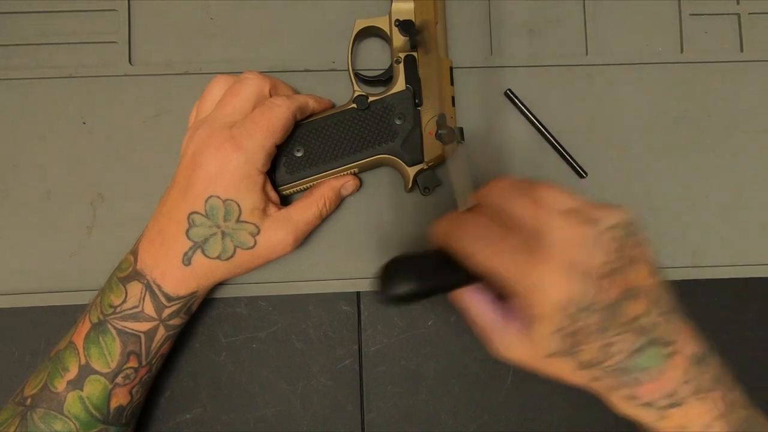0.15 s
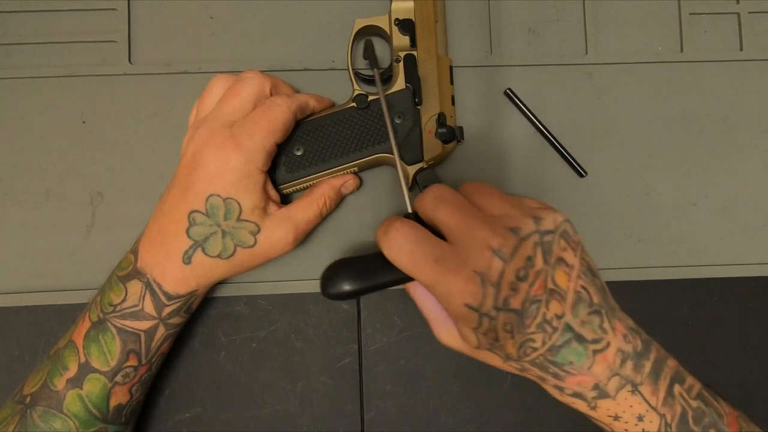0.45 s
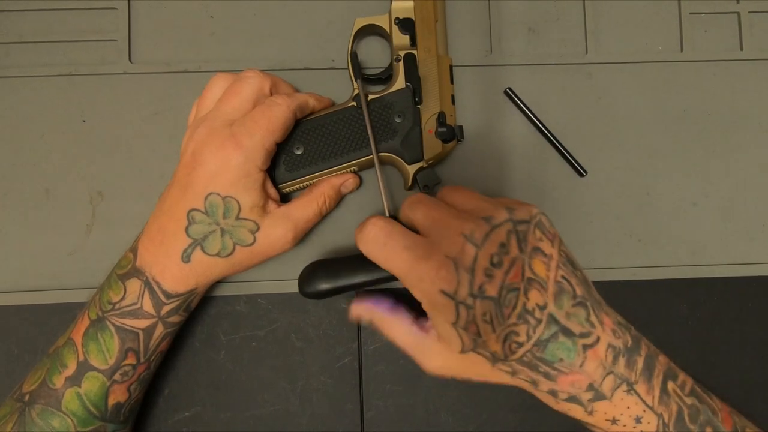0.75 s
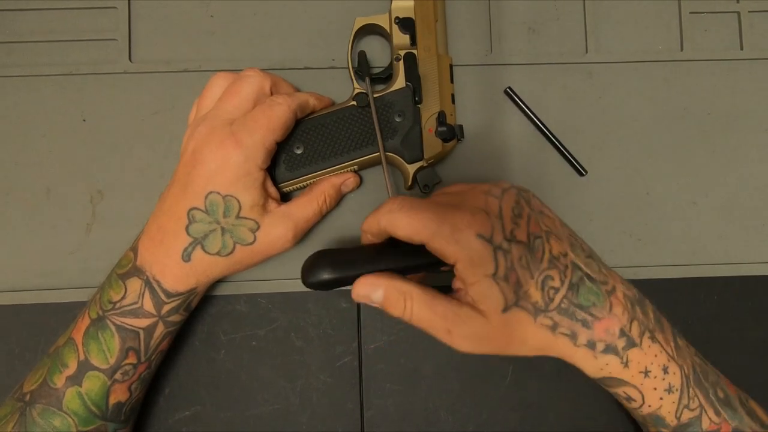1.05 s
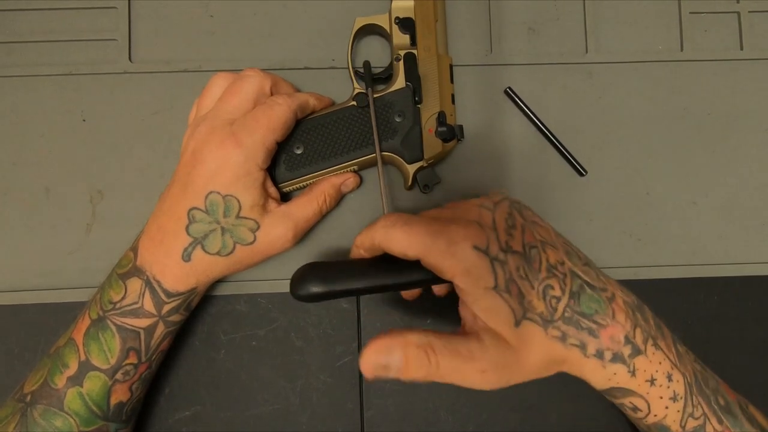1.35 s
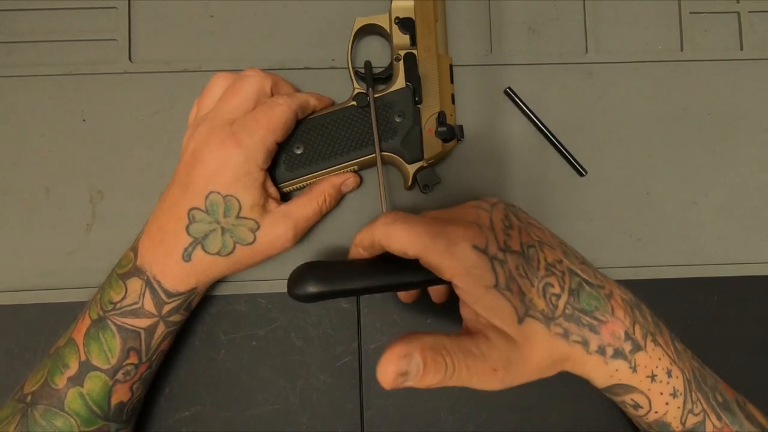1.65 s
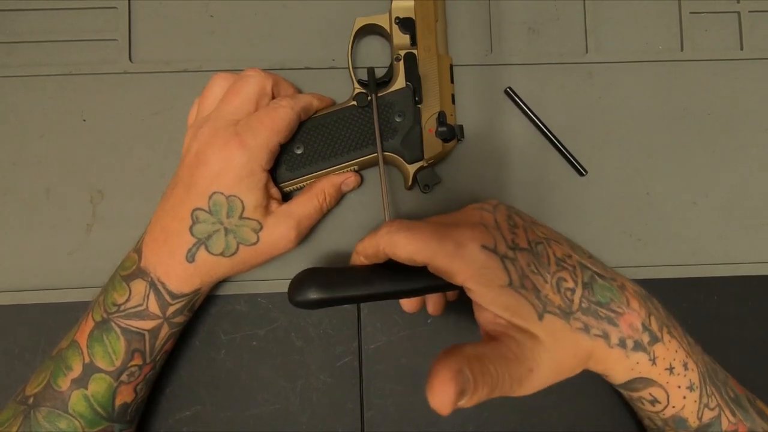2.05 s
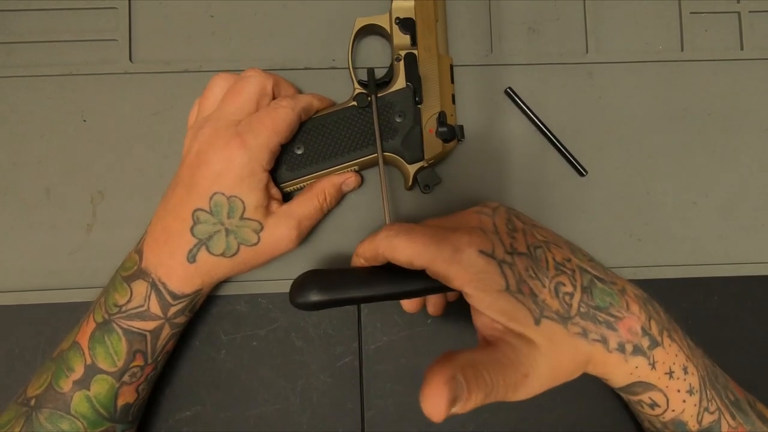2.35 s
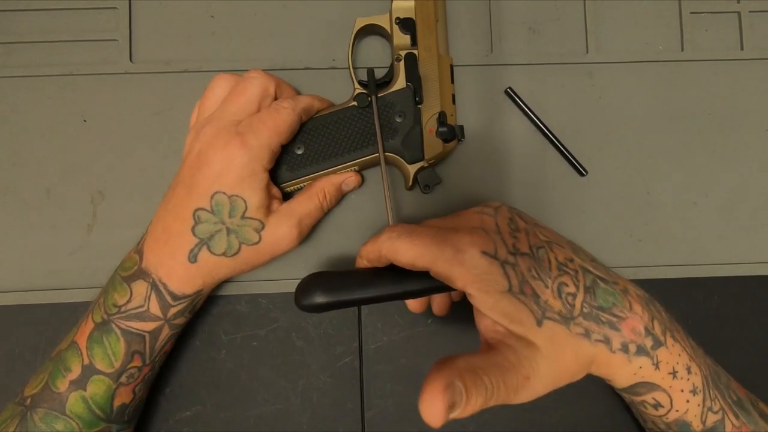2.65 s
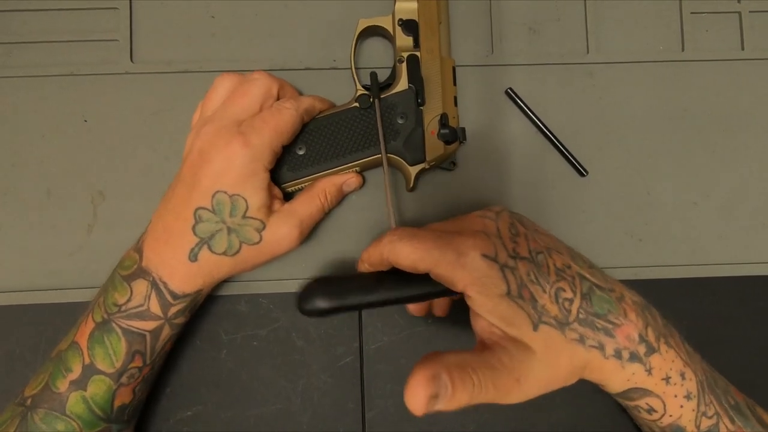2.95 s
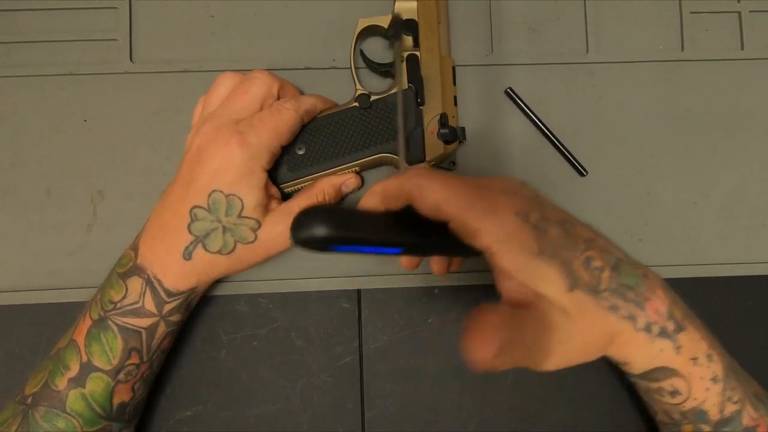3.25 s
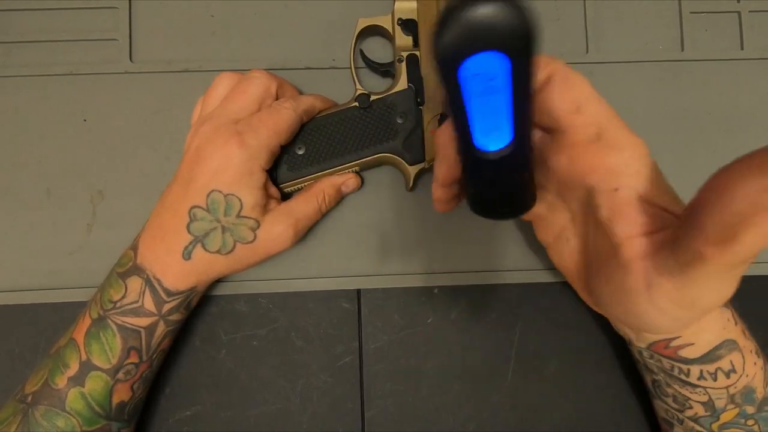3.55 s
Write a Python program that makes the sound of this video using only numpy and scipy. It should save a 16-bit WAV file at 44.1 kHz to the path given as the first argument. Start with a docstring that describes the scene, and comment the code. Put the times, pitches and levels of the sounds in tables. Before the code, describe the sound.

Pistol trigger tested with a metal gauge: sharp clicks and a loud hammer snap in a quiet room

```python
"""Over ventilation hum and hiss in a small quiet room, a trigger gauge is hooked into a pistol lying on a mat.
Its rod taps and scrapes, the trigger takes up, the hook ticks, the hammer falls and shakes the bench, and
the hook knocks free. Air and scrapes are shaped noise; each blow is a noisy crack, a sum of dying modes and
a bench thud, with a separate feed to the room's echo. A microphone pair stands above the bench."""
import sys
import numpy as np
from scipy import signal
from scipy.fft import rfft, irfft
from scipy.io import wavfile
from scipy.ndimage import uniform_filter1d

SR = 44100
rng = np.random.default_rng(int(sys.argv[2]) if len(sys.argv) > 2 else 0)


def inscribe(sig):
    """Save sig as 16-bit PCM at rate SR to the path in sys.argv[1].

    A 1-D sig is mono; a 2-D sig holds one channel per row.
    Samples are clipped to [-1, 1] before scaling.
    """
    pcm = np.round(np.clip(np.atleast_2d(sig).T, -1, 1) * 32767)
    wavfile.write(sys.argv[1], SR, pcm.astype(np.int16))


N = 163170

# Load of the hands on the bench. Each row: time in seconds, rumble level in dB, low-middle level in dB.
HAND_LOAD = [(0, -72.5, -69), (.57, -77, -67), (0.612, -68, -54.5), (0.671, -69, -57), (.8, -81, -66),
             (1.05, -89, -58.5), (1.3, -66, -67.5), (1.598, -71, -67.5), (1.901, -68.5, -66),
             (1.98, -86.5, -62.5), (2.1, -72.5, -66.5), (2.35, -62.5, -68), (2.5, -75.5, -62),
             (2.701, -79, -68.5), (3.0, -64.5, -57), (3.13, -62, -59), (3.2, -80.5, -75), (3.7, -82, -66.5)]

STEEL_LONGEST_S, STEEL_DETUNE = .016, .015  # the mat damps the steel; detuning as a share of pitch
HALVES = np.array([[.5], [-.5]])  # splits a left-minus-right level between the ports


def amp(db):
    """Level law: an amplitude ratio is ten to the power of dB / 20."""
    return 10 ** (np.asarray(db) / 20)


def evened(x):
    """Normalisation: divides a signal by its root mean square."""
    return x / np.sqrt(np.mean(x ** 2) + 1e-20)


def read(points, hz):
    """Logarithmic pitch scale: interpolates (Hz, value) points along log frequency."""
    f, value = np.transpose(points)
    return np.interp(np.log(hz + 1), np.log(f + 1), value)


def add(mix, start_s, sound):
    """Superposition: adds a sound into the mix from its start time."""
    part = mix[:, max(round(start_s * SR), 0):][:, :sound.shape[1]]
    part += sound[:, :part.shape[1]]


def coloured(x, db_of):
    """Linear filtering: weights the spectrum of each row by a gain in dB that depends on frequency."""
    hz = np.fft.rfftfreq(x.shape[-1], 1 / SR)
    return irfft(rfft(x) * amp(db_of(hz)), x.shape[-1])


def background():
    """Stationary noise: ventilation and microphone hiss, whose low bands follow the hands' load on the bench."""
    # Each row: frequency in Hz, spectral density in dB per Hz before each band is set to its level.
    air_spectrum = [(15, -38.5), (25, -16.5), (59, -1), (87, -18), (141, -23.5), (175, -8.5), (249, -16),
                    (270, -6), (384, -32), (840, -20), (1070, -30), (1190, -29.5), (1290, -30), (1610, -34),
                    (3720, -43), (7310, -46.5), (16000, -61.5)]
    # Each row: frequency in Hz, left-right correlation from -1 to 1.
    likeness = [(60, -0.5), (180, 0.27), (550, -0.56), (1650, -0.3), (4970, -0.4), (15000, 0.3)]
    air_db, patchy_db = -68.5, 2.2  # level above 400 Hz; unevenness over time and pitch
    frames, hz = N // 256 + 5, np.fft.rfftfreq(1024, 1 / SR)
    a, b, c, d, patches = rng.standard_normal((frames, 513, 5)).T
    patches = uniform_filter1d(patches, 8, 0)
    patches = evened(uniform_filter1d(patches, 10, 1))

    same = np.clip(read(likeness, hz), -1, 1)[:, None]
    left, other = a + 1j * b, c + 1j * d
    right = same * left + np.sqrt(1 - same ** 2) * other
    z = np.array([left, right]) * amp(read(air_spectrum, hz)[:, None] + patchy_db * patches)

    load_s, rumble_db, body_db = np.transpose(HAND_LOAD)
    t = np.arange(frames) * 256 / SR
    bands = ((hz < 115, np.interp(t, load_s, rumble_db)),
             ((hz >= 115) & (hz < 400), np.interp(t, load_s, body_db)),
             (hz >= 400, air_db))
    parts = []
    for band, db in bands:
        part = z * band[:, None]
        loudness = np.std(signal.istft(part, nperseg=1024, noverlap=768)[1])
        parts.append(part * amp(db) / loudness)
    return signal.istft(sum(parts), nperseg=1024, noverlap=768)[1][:, :N]


def hums():
    """Narrow-band noise: low tones waver by their own bandwidth and follow the load on the bench."""
    # Each row: centre in Hz, width in Hz, level in dB against the load curve,
    # column of that curve (1 rumble, 2 low middle).
    low_tones = [(63, 3.6, -2.5, 1), (176.3, 8, -8, 2), (228.6, 5.6, -5.5, 2)]
    curve, t, out = np.transpose(HAND_LOAD), np.arange(N) / SR, 0
    for centre_hz, width_hz, db, which in low_tones:
        noise = rng.standard_normal((3, N))
        band = coloured(noise[0] + 2.2 * noise[1:],  # one part shared by the ports, one of their own
                        lambda hz: -20 * np.log10(1 + (2 * (hz - centre_hz) / width_hz) ** 2))
        out = out + evened(band) * amp(db + np.interp(t, curve[0], curve[round(which)]))
    return out


def scrapes():
    """Friction of rod and hand: dense uneven grains modulate broad-band noise that swells and fades."""
    # Each row: middle in seconds, length in seconds (between the 1/e points of the swell), level in dB,
    # centre in Hz, width in octaves (6 dB down this far from the centre).
    strokes = [(0.139, 0.088, -70.5, 3066, 0.98), (0.907, 0.07, -72, 4720, 0.4),
               (0.938, 0.14, -62, 2470, 1.09), (1.11, 0.012, -47.5, 4180, 0.57),
               (1.298, 0.033, -59.5, 3080, 0.92), (1.421, 0.031, -70.5, 3950, 0.93),
               (2.578, 0.034, -69, 3000, 0.45), (3.071, 0.091, -57, 2753, 1.1),
               (3.207, 0.053, -62, 4170, 0.82), (3.447, 0.058, -71.5, 3440, 0.48),
               (3.513, 0.045, -73.5, 3960, 0.83), (3.619, 0.55, -74.5, 1235, 1.17)]
    grains_per_s, grain_spread_db = 6500, 4
    size, middle = 32768, 16384
    out = np.zeros((2, N))
    for middle_s, length_s, db, centre_hz, octaves in strokes:
        noise, t = rng.standard_normal((3, size)), (np.arange(size) - middle) / SR
        present = rng.random(size) < grains_per_s / SR
        grains = present * amp(grain_spread_db * np.minimum(rng.exponential(1, size), 3.5))
        grit = evened(uniform_filter1d(grains, size=30))
        band = coloured(grit * (noise[0] + 0.43 * noise[1:]),
                        lambda hz: -6 * (np.log2(hz / centre_hz + 0.001015) / octaves) ** 2)
        pad = np.zeros((2, N + size))
        add(pad, middle_s, amp(db) * evened(band) * np.exp(-(2 * t / length_s) ** 2))
        out += pad[:, middle:N + middle]
    return out


def ring(modes, colour_db, rise_s, lag_s, longest_s, detune):
    """Modal decay: a sum of dying sines, detuned at each blow, with a small phase lag of its own at each port."""
    hz, db, t60 = np.transpose(modes)[:, :, None]
    hz = hz * (1 + detune * rng.uniform(-0.89, 1, hz.shape))
    t = np.arange(SR // 4) / SR
    lag = lag_s(hz) * rng.standard_normal((2, len(modes), 1))
    decay_db = -60 * t / np.clip(t60, .002, longest_s)
    fade = amp(db + colour_db(hz) + decay_db) * (1 - np.exp(-t / rise_s))
    out = (fade * np.sin(2 * np.pi * hz * (t + lag))).sum(1)
    return out / np.abs(out).max()


def bench_push(t):
    """Impulse response of a support: the first shove of the bench, which springs back at once."""
    push_s, push_db, left_db, cut_hz = .003, 2.5, 7, 61  # levels against the thud, left minus right
    push = t / push_s * (1 - t / push_s / 2) * np.exp(1 - t / push_s) * amp(push_db + left_db * HALVES)
    return signal.lfilter(*signal.butter(1, cut_hz, "high", fs=SR), push)


def blows(rows, modes, crack_db, longest_s, ringing_db, click_db, detune, rise=.00063):
    """Impact excitation: crack, ringing part and bench thud; returns direct sound and what feeds the room."""
    # Each row: mode frequency in Hz, level in dB before the ring is scaled, 60 dB decay time in seconds.
    bench_modes = [(39.8, -5, 0.017), (62.4, -6, .15), (102.7, -9, 0.12), (158, 0, 0.12),
                   (211.5, -3.5, 0.16), (278, -11.5, 0.1), (349.8, -16, 0.045)]
    # Limits of the noisy edge of a blow. Each row: frequency in Hz, gain in dB.
    crack_limits = [(200, -18.5), (700, -12), (1500, 9.5), (10300, -3.5), (11500, -12), (16400, -24.5)]
    base_crack_db, crack_s, crack_rise_s = -5, 0.0028, .00063  # time constants of fall and rise
    thud_rise_s, thud_left_db, bench_longest_s, bench_detune = 0.0016, 3.5, .2, .05
    spot_db, spot_octaves = 16.5, .25  # boost of the modes near the struck spot's pitch
    room_ring_db = -11  # the room hears the part from all sides: an even click, little ring
    direct, spread, t = np.zeros((2, N)), np.zeros((2, N)), np.arange(2048) / SR
    outline = [row[:2] for row in modes]
    push = bench_push(t)

    def port_lag(hz):
        return .00005 * hz / 9450  # scatter in seconds, growing with pitch

    for start_s, db, tilt_db, pan_db, thud_db, *more in rows:
        spot, rise_s = more[:1], (more[1:] or [rise])[0]
        soft_db = 20 * np.log10(min(rise / rise_s, 1))  # a soft nudge hardly cracks
        side = amp(db + pan_db * HALVES)

        def tilt(hz):
            return tilt_db * np.log2(hz / 2500 + 0.013)

        def struck(hz):
            return tilt(hz) + sum(spot_db * np.exp(-(np.log2(hz / f) / spot_octaves) ** 2) for f in spot)

        def edge(hz):
            return read(crack_limits, hz) + read(outline, hz)

        noise = rng.standard_normal((3, 2048))
        crack = evened(coloured(noise[0] + .5 * noise[1:], lambda hz: edge(hz) + tilt(hz)))
        crack = crack * np.exp(-t / crack_s) * (1 - np.exp(-t / crack_rise_s))
        crack = side * amp(base_crack_db + crack_db + soft_db) * crack
        tone = side * ring(modes, struck, rise_s, port_lag, longest_s, detune)
        thud = ring(bench_modes, np.zeros_like, thud_rise_s, lambda hz: .0007, bench_longest_s, bench_detune)
        thud = amp(thud_db + thud_left_db * HALVES) * thud
        for sound in (crack, tone, thud, amp(thud_db) * push):
            add(direct, start_s, sound)

        impulse = 1. * (np.arange(2048) == 32)[None]
        click = coloured(impulse, lambda hz: uniform_filter1d(edge(hz), size=80) + tilt(hz))
        click = click / np.linalg.norm(click) * (t < .006)
        add(spread, start_s, amp(db + click_db + soft_db) * click)
        add(spread, start_s, amp(room_ring_db + ringing_db) * tone)
    return np.array([direct, spread])


def rod_taps():
    """Modes of a lightly damped bar: the spot touched favours nearby pitches, a slow rise makes a soft nudge."""
    # Each row: start in seconds, level in dB, tilt in dB per octave, left minus right in dB, bench thud in dB,
    # pitch of the modes that this spot excites most in Hz, rise in seconds.
    taps = [(.726, -29, -0.5, -0.5, -51, 1960, 0.00047), (.7315, -45, -7, 17, -46.5, 1400, 0.00047),
            (.765, -44.5, -14.5, -4.5, -60, 1350, 0.0049), (1.058, -31, -4, -0.5, -77, 3920, 0.00051),
            (1.0615, -38.5, 2.5, 4, -49, 1385, 0.0063), (1.287, -52.5, 4, 3, -67, 1470, 0.0084),
            (1.300, -42.5, -2.5, -5, -61.5, 1700, 0.0027), (1.415, -52.5, 7.5, -5, -74, 1410, 0.0053),
            (1.527, -52.5, -5.5, -0.9, -70.5, 825, 0.00041), (1.972, -54.5, -3, -4, -57.5, 756, .0004),
            (2.536, -56, -10.5, 11, -65, 1826, .0004), (2.568, -52, -6, 2, -77, 3620, .0004),
            (2.833, -56.5, -6, 2, -79, 734, 0.00036)]
    # Each row: mode frequency in Hz, level in dB before the ring is scaled, 60 dB decay time in seconds.
    rod_modes = [(756, -10, 0.048), (880.3, -8.5, .04), (1383, -5.5, 0.057), (1420, -9, 0.12),
                 (1844, -10, 0.014), (2288, -9.5, 0.024), (2570, -5.5, 0.048), (3960, -9.5, 0.023),
                 (4920, -7, 0.026), (6540, -18, 0.011), (7600, -16, 0.0077), (8500, -21, 0.02)]
    return blows(taps, rod_modes, crack_db=-0.67, longest_s=.18, ringing_db=2, click_db=16, detune=.002)


def trigger_knocks():
    """Damped steel modes: the trigger takes up in a run of knocks whose ring builds slowly."""
    # Each row: start in seconds, level in dB, tilt in dB per octave, left minus right in dB, bench thud in dB.
    knocks = [(1.1168, -7, -0.2, 3, -35.5), (1.1186, -18, -1.8, 1.7, -56.5), (1.1245, -25.5, -1, 2, -52.5),
              (1.1322, -17.5, -3, 1.2, -46), (1.1395, -21, -3.5, 3.3, -47), (1.1475, -29, -2.5, 2, -50),
              (1.158, -27, -4, 1.5, -59.5), (1.163, -31.5, -5, 1.3, -51.5), (1.203, -39, -6.5, 0.83, -80),
              (1.213, -44.5, -14, 0.52, -67), (1.549, -53.5, 2, 0.57, -62.5)]
    # Each row: mode frequency in Hz, level in dB before the ring is scaled,
    # 60 dB decay time in seconds before the mat's limit.
    trigger_modes = [(816.6, -16, .02), (1680.5, -6, .02), (1600, -12, .025), (2500, 2.5, 0.054),
                     (2645, 0, 0.075), (3728, -5.5, 0.034), (4253, -10, 0.01), (5110, -5.5, 0.013),
                     (6300, -10.5, 0.011), (8000, -15, 0.008), (9740, -14, 0.004)]
    return blows(knocks, trigger_modes, crack_db=-3, longest_s=STEEL_LONGEST_S, ringing_db=4, click_db=10,
                 detune=STEEL_DETUNE, rise=0.0025)


def hook_ticks():
    """Point-dependent excitation: the hook ticks and knocks free, each contact favouring its own modes."""
    # Each row: start in seconds, level in dB, tilt in dB per octave, left minus right in dB, bench thud in dB,
    # pitch of the modes that this spot excites most in Hz.
    ticks = [(1.868, -50.5, 5.5, -1.06, -69, 4500), (1.93, -39.5, -3, 0.62, -66.5, 3000),
             (3.0942, -27.5, -2.5, 0.92, -46, 3000), (3.1005, -38, -0.7, 0.44, -62, 4200),
             (3.1295, -39.5, -0.5, 0.27, -67, 2300), (3.2181, -10, 2.5, -1.3, -47.5, 3000),
             (3.2199, -18, 5.5, -1.5, -81.5, 1700), (3.224, -25.5, 3, -1.03, -48, 790),
             (3.2285, -25.5, 6.5, -0.71, -75.5, 8100)]
    # Each row: mode frequency in Hz, level in dB before the ring is scaled,
    # 60 dB decay time in seconds before the mat's limit.
    hook_modes = [(785, -15.5, 0.03), (1700, -12, 0.03), (2130, -10, 0.021), (2594, -1, 0.0041),
                  (3000, -16.5, .02), (3496, -7.5, 0.018), (4200, 0, 0.011), (4770, -6.5, 0.016),
                  (5590, -3, 0.01), (6400, -10, 0.024), (8020, -3.5, 0.0031), (9290, -9, 0.03),
                  (9960, -11.5, 0.0096), (13000, -17.5, 0.0093)]
    return blows(ticks, hook_modes, crack_db=-0.38, longest_s=STEEL_LONGEST_S, ringing_db=-2.0, click_db=14.5,
                 detune=STEEL_DETUNE)


def hammer_blows():
    """Impact on a support: the hammer falls in a burst of bright steel blows and shakes the bench."""
    # Each row: start in seconds, level in dB, tilt in dB per octave, left minus right in dB, bench thud in dB.
    falls = [(2.8755, -44, 4.6, 1.5, -72.5), (2.886, -29.5, 3, 1.7, -44.5), (2.8972, -22.5, 0.33, 1.3, -53),
             (2.8995, -27.5, 0.9, 0.67, -38), (2.9028, -12.5, 1.76, 2.5, -44.5),
             (2.9077, -0.5, 3.02, 1.1, -28.5), (2.9100, -17.5, 2, 0.45, -15.5),
             (2.9150, -20.5, 7.5, .6, -39.5), (2.9185, -20.5, 3.54, 0.61, -36.5)]
    # Each row: mode frequency in Hz, level in dB before the ring is scaled,
    # 60 dB decay time in seconds before the mat's limit.
    hammer_modes = [(844, -4.5, 0.01), (1717, -8.5, 0.02), (1990, -1.5, 0.0092), (3330, -12.5, 0.036),
                    (3578, -8, 0.027), (3904, -5, 0.0066), (6240, -7, 0.0095), (7240, -11, 0.0059),
                    (8710, -4, 0.011), (9660, -5.5, 0.016), (9920, -2.5, 0.0069), (11190, -11.5, 0.0041),
                    (13100, -15, .006)]
    return blows(falls, hammer_modes, crack_db=0.24, longest_s=STEEL_LONGEST_S, ringing_db=-11.0,
                 click_db=13.47, detune=STEEL_DETUNE)


def room(x):
    """Reverberation: sparse taps of random sign, each band dying at its own speed, partly shared by the ports."""
    # Each row: frequency in Hz, 60 dB decay time in seconds.
    decay = [(100, 0.9), (500, .2), (1500, 0.18), (3000, 0.25), (8000, .25), (14000, 0.32)]
    # Each row: frequency in Hz, gain in dB.
    colour = [(100, 12.5), (800, 0.5), (2000, -2.5), (5000, -3), (10000, 0), (12000, -9), (16000, 0)]
    room_db, shared, gap_s = -4, 0.31, 0.0065  # no echo arrives before the gap has passed
    taps = np.zeros((3, SR // 2))
    grid = np.arange(0, SR // 2 - 20, 20)
    places = grid + rng.integers(0, 20, (3, len(grid)))
    np.put_along_axis(taps, places, rng.choice([-1., 1.], (3, len(grid))), 1)
    taps[:, :round(gap_s * SR)] = 0
    hz, t, z = signal.stft(shared * taps[0] + (1 - shared) * taps[1:], SR, nperseg=128)
    fade_db = read(colour, hz)[:, None] - 60 * t / read(decay, hz)[:, None]
    tail = signal.istft(z * amp(fade_db), SR, nperseg=128)[1]
    tail = tail / np.linalg.norm(tail[0])
    return amp(room_db) * signal.fftconvolve(x.mean(0)[None], tail, axes=1)[:, :N]


def scene():
    """Superposition of air, hums, scrapes, blows and the room's answer."""
    air = background() + hums()
    rubbed = scrapes()
    direct, spread = rod_taps() + trigger_knocks() + hook_ticks() + hammer_blows()
    return direct + rubbed + room(spread + rubbed) + air


def record(dry):
    """Saturation and band limiting: the converter's ceiling, then a steep low-pass filter."""
    ceiling, edge_hz = .82, 16450
    edge = signal.firwin(511, edge_hz, window=("kaiser", 13), fs=SR)
    return signal.oaconvolve(np.clip(dry, -ceiling, ceiling), edge[None], "same")


dry = scene()
out = record(dry)
inscribe(out)
```